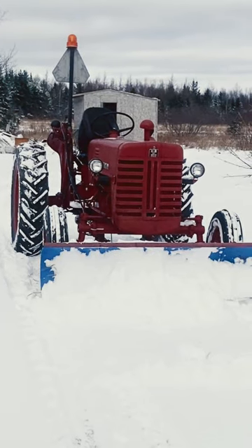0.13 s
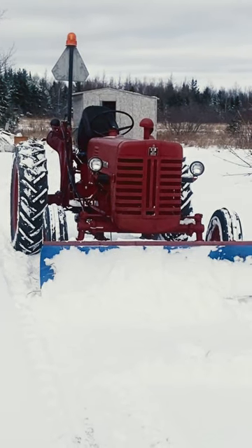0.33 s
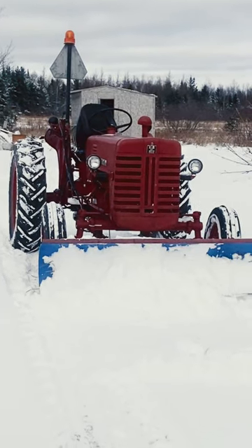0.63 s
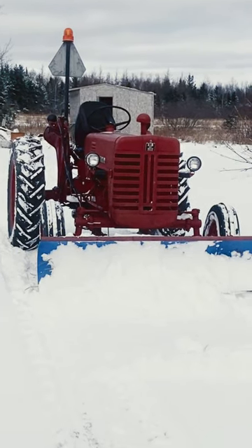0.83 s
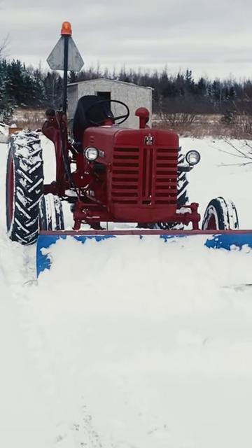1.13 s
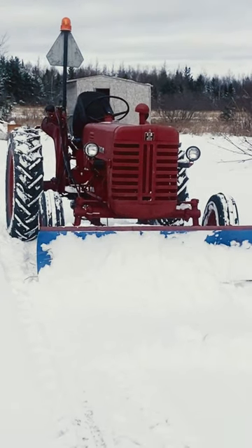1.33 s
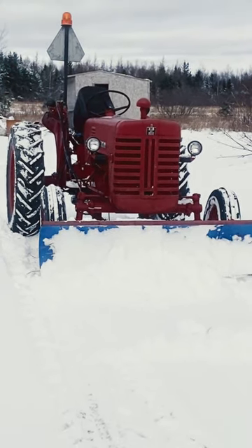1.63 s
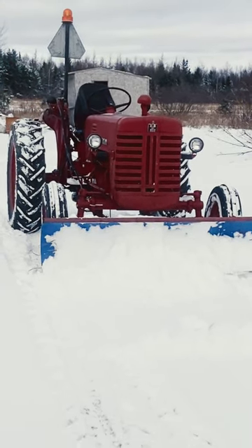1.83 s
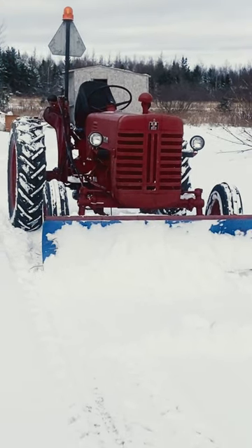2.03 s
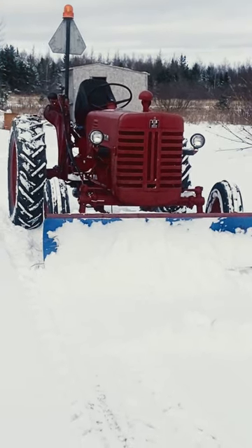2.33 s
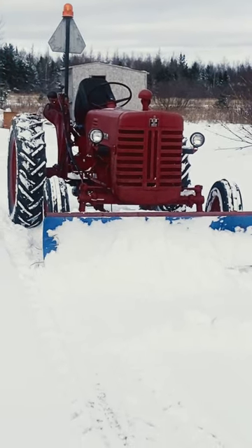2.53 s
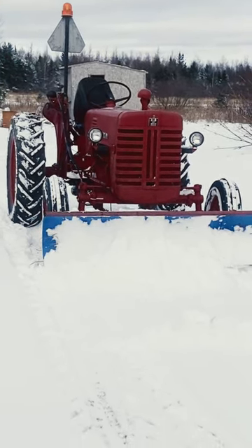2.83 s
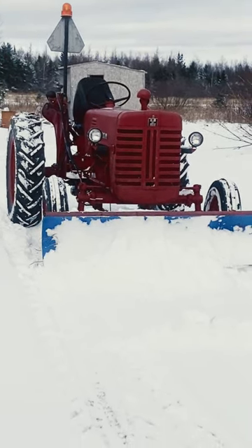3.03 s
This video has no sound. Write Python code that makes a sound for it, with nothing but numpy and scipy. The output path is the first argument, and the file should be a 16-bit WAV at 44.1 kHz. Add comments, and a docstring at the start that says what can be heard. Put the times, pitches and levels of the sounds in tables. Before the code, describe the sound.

An old tractor engine idles steadily outdoors, throbbing and clattering, with soft low wind bumps.

```python
"""Idling four-cylinder tractor

An old engine idles: uneven exhaust throb (sum of cycle-rate cosines), hollow knocks and valve taps
(decaying modes), dry ticks, clatter and hiss (shaped noise), singing panels (narrow wavering bands).
Soft low bumps (gliding tones) with puffs of air (noise) hit the microphone, over a low noise rumble.
"""
import sys
import numpy as np
from scipy.fft import rfft, irfft, next_fast_len
from scipy.io import wavfile
from scipy.ndimage import map_coordinates

SR = 44100
rng = np.random.default_rng(int(sys.argv[2]) if len(sys.argv) > 2 else 0)


def bounce(signal):
    """Save signal as a 16-bit WAV file at the path given by the first command-line argument."""
    frames = np.transpose(np.atleast_2d(signal))
    limited = np.clip(frames, -1, 1)
    pcm = np.round(limited * 32767).astype(np.int16)
    wavfile.write(sys.argv[1], SR, pcm)


N = 140679

# Crankshaft speed. Each row: time in seconds, speed in rpm.
CRANK_RPM = [(0.0, 1212), (0.25, 1206), (0.7, 1220), (1.25, 1234), (1.52, 1241), (1.8, 1212), (2.0, 1210),
             (2.25, 1182), (2.6, 1220), (2.78, 1210), (2.95, 1233), (3.19, 1213)]
# Exhaust orders. Each row: multiple of the cycle rate, relative level in dB.
EXHAUST_ORDERS = [(1, -53), (2, -32.5), (3, -32.5), (4, -1.5), (5, -22.5), (6, -19), (7, -18), (8, 5.5),
                  (9, -10), (10, -6), (11, -9), (12, -19), (13, -13.5), (14, -18), (15, -23)]
EXHAUST_DB, EXHAUST_PLACE_CYCLES, SIDE_ORDER_RAD = -31, 0.98, 0.7
ORDER_WAVER_DB, THROB_WAVER_DB = 0.93, 0.6

# Hollow knocks. Each row: place in the cycle 0-1, left gain in dB, right gain in dB, pitch ratio,
# fall time constant in seconds.
KNOCKS = [(0.069, -40.5, -31, 1.13, .01), (0.319, -27.5, -22.5, 1.012, 0.0069),
          (0.486, -39.5, -35, 1.07, 0.0029), (0.563, -31, -27.5, 0.973, .0065),
          (.615, -40, -34.5, .97, 0.0064), (0.82, -42.5, -39, 1, .008)]
# Knock modes. Each row: frequency in Hz, relative level in dB before the microphone shift, in dB after.
KNOCK_MODES = [(531.7, -14, -11.5), (570.7, -0.5, -10), (641, -27, -0.5), (674, -2, -16.5)]
# Gain common to all knocks. Each row: time in seconds, gain in dB.
KNOCK_GAIN = [(0, 0.5), (.9, -0.5), (1.3, -1), (1.8, 0.5), (2.0, 0), (2.4, -1), (3.19, 0)]
KNOCK_DETUNE_SHARE = 0.015

# Valves opening and shutting. Each row: place in the cycle 0-1, tap gain in dB, pitch ratio,
# extra gain of the upper cover modes in dB, gain of the dry tick in dB.
VALVE_TAPS = [(.035, -45.5, 1, 9.5, -44.5), (.11, -48.5, 1, -6.5, -45), (0.224, -40, .97, -2.5, -54.5),
              (.278, -44, 1.03, 7.5, -44.5), (.472, -32.5, .89, 4, -47), (.525, -39, 1.02, -5.5, -51),
              (0.596, -39.5, 1.01, -11, -49.5), (.712, -37, 1.05, -7, -54), (.785, -38.5, 1, 5.5, -55.5),
              (.96, -30, .975, -1, -50)]
# Valve cover modes. Each row: frequency in Hz, relative level in dB before the microphone shift,
# in dB after, 60 dB decay time in seconds.
COVER_MODES = [(722, -1, -11, .035), (1217, -9.5, -5.5, 0.051), (1363.5, -1, -0.5, 0.043),
               (1642, -11, -9, .05), (1847, -15, -11.5, 0.027), (2071, -8, -7.5, 0.041),
               (2224, -22.5, -14, 0.013)]
TAP_MODE_SCATTER_DB, TAP_DETUNE_SHARE = 2.26, 0.011
# Dry tick spectrum. Each row: frequency in Hz, relative density in dB per Hz.
TICK_SPECTRUM = [(1200, -26.5), (1700, -1.5), (2100, 0), (2550, -14), (3100, 0.5), (4500, -4), (5400, -10),
                 (6500, -19), (8000, -15.5), (9000, -29)]
# Ticks of a loose part. Each row: start in seconds, gain in dB.
LOOSE_TICKS = [(2.313, -45), (2.365, -43), (2.467, -46.5), (2.52, -41.5)]

# Clatter swells, one per firing. Each row: place in the cycle 0-1, gain in dB over the steady wash
# (before the depth and the burst shape).
FIRING_SWELLS = [(0.208, 5.5), (0.452, 8.5), (0.699, 9.5), (0.948, 6.5)]
# Clatter spectrum of the block. Each row: frequency in Hz, relative density in dB per Hz.
CLATTER_SPECTRUM = [(120, -36.5), (190, 0), (245, -4.5), (295, 2.5), (350, -2), (395, 0.5), (460, -1.5),
                    (570, -3), (720, -3), (850, -2), (1030, -10), (1200, -4), (1400, -5), (1650, -7),
                    (1850, -12.5), (2050, -10.5), (2280, -9), (2420, -26), (2600, -22.5), (3050, -18.5),
                    (3550, -20.5), (3950, -26.5), (4600, -24), (5300, -37.5), (7000, -46.5)]
# Clatter colour after the microphone shift. Each row: frequency in Hz, change in dB.
CLATTER_SHIFT = [(200, -3), (300, 0.5), (400, -2), (600, 2), (800, -2.5), (1150, 1.5), (1420, -3.5),
                 (1900, 1), (2550, 3.5), (3200, -0.5), (4500, 1)]
# Clatter that is the same every cycle. Each row: frequency in Hz, power share 0-1.
REPEAT_SHARE = [(150, 0.39), (1300, 0.56), (2000, 0.17), (3200, 0.081)]
# Spectrum of the fine ticking hiss. Each row: frequency in Hz, relative density in dB per Hz.
HISS_SPECTRUM = [(2000, -36.5), (3300, 1.5), (4600, -11.5), (5700, 5.5), (6400, 10), (7000, 7), (7600, 7.5),
                 (8400, 2), (9000, -32.5)]
CLATTER_DB, HISS_DB, RUMBLE_DB = -36, -60, -33.5

# Sheet-metal panels. Each row: frequency in Hz, waver rate (band width) in Hz,
# level in dB before the microphone shift, in dB after.
PANELS = [(294, 22, -54, -51), (391, 22, -54.5, -56.5), (574.4, 29, -46, -55), (709, 35, -46, -57),
          (1381, 45, -43.5, -56)]

# Bumps on the microphone. Each row: middle in seconds, gain in dB, pitch at the middle in Hz,
# envelope time scale in seconds, gain of the air puff in dB.
BUMPS = [(0.841, -16.5, 66, 0.014, -34), (1.0492, -9, 78, 0.008, -29.5), (1.2804, -9.5, 79, 0.0067, -37),
         (1.334, -14.5, 74.7, 0.0048, -40.5), (1.61, -20, 92, 0.0039, -30),
         (1.63, -10.5, 60.5, 0.011, -43.5), (2.165, -18, 58, 0.0063, -36.5)]
BUMP_SETTLE_S, BUMP_START_RATIO, BUMP_END_RATIO = 0.01324, 2.8, 0.645  # ratios to the middle pitch
# Puff spectrum. Each row: frequency in Hz, relative density in dB per Hz.
PUFF_SPECTRUM = [(40, -13), (90, 1), (180, -0.5), (300, -7.5), (480, -31), (900, -61)]
PUFF_LEAD_S, PUFF_SCALE_S = 0.0096, 0.015
# Rumble spectrum. Each row: frequency in Hz, relative density in dB per Hz.
RUMBLE_SPECTRUM = [(15, -43.5), (28, -26), (42, -1), (60, 7.5), (80, -4), (100, 6), (120, -7), (160, -12.5),
                   (220, -23), (400, -52.5)]

# Microphone shift. Each row: time in seconds, how far it has shifted 0-1.
MIC_SHIFT = [(0, 0.49), (1.3, 0.14), (1.95, 0.91), (3.19, 0.83)]
# Left-right likeness. Each row: frequency in Hz, likeness 0-1.
LIKENESS = [(60, 0.49), (200, 0.28), (600, 0.54), (1000, 0.16), (1350, 0.88), (2200, 0.88), (4000, 0.22),
            (8000, 0.28)]
# Left-right phase. Each row: frequency in Hz, lead of left over right in radians.
LEFT_LEAD = [(100, 0.5), (240, 0.5), (400, -2.5), (750, -1), (1200, 0.9), (1550, -2), (2100, 1.66),
             (2600, -11), (3000, -5.5), (8000, -9)]
# Left-right balance. Each row: frequency in Hz, left minus right in dB.
BALANCE = [(60, 7), (94, -6), (150, -0.5), (230, -0.5), (360, 1.5), (560, -3.5), (880, -6.5), (1380, -7.5),
           (2150, -2), (3370, -2), (5270, -0.5), (8250, -11)]
TOP_HZ = 8900


def exhaust(cycles):
    """Pipe throb: strongest at twice the firing rate, with side orders from unequal cylinders."""
    throb = np.zeros(N)
    for order, db in EXHAUST_ORDERS:
        # The shift vanishes at multiples of the firing rate (every fourth order).
        shift_rad = SIDE_ORDER_RAD * np.sin(np.pi * order / 4)
        phase = 2 * np.pi * order * (cycles - EXHAUST_PLACE_CYCLES) + shift_rad
        throb += amp(db + ORDER_WAVER_DB * wobble(5.4)) * np.cos(phase)
    level = amp(EXHAUST_DB + THROB_WAVER_DB * wobble(29.9))
    return level * unit(throb) * pan(db=-4.5)


def knocks(cycles, right_lead_rad=1.75, rough_rad=0.1, rise_s=0.002):
    """Hollow modes that swell quickly and ring on, each stroke at a slightly different pitch."""
    out, shift = np.zeros((2, N)), curve(MIC_SHIFT)
    for place, left_db, right_db, ratio, fall_s in KNOCKS:
        u, gain = strokes(cycles, place, scatter_db=0.5, jitter_s=0.0002)
        pitch = ratio * (1 + KNOCK_DETUNE_SHARE * per_stroke(cycles, place))
        phase = np.array([[0], [right_lead_rad]]) + rough_rad * np.array([wobble(250), wobble(250)])
        note = np.zeros((2, N))
        for hz, before_db, after_db in KNOCK_MODES:
            level = amp(before_db + (after_db - before_db) * shift)
            note += level * np.cos(2 * np.pi * hz * pitch * u + phase)
        envelope = 2 / (np.exp(-u / rise_s) + np.exp(u / fall_s))
        out += amp([[left_db], [right_db]]) * gain * note * envelope
    return out * amp(curve(KNOCK_GAIN))


def taps(cycles, attack_s=0.0012, treble_hz=1500):
    """Valves ring their cover in decaying modes, every stroke with its own mix."""
    out, shift = np.zeros((2, N)), curve(MIC_SHIFT)
    for place, db, ratio, treble_db, _ in VALVE_TAPS:
        u, gain = strokes(cycles, place, scatter_db=1.2, jitter_s=0.0003)
        u = np.maximum(u, 0)
        blow = amp(db) * gain * (1 - np.exp(-u / attack_s))
        for hz, before_db, after_db, t60_s in COVER_MODES:
            level_db = before_db + (after_db - before_db) * shift
            level_db = level_db + treble_db * (hz > treble_hz)
            level_db = level_db + TAP_MODE_SCATTER_DB * per_stroke(cycles, place)
            pitch_hz = hz * ratio * (1 + TAP_DETUNE_SHARE * per_stroke(cycles, place))
            ring = amp(level_db - 60 * u / t60_s) * np.sin(2 * np.pi * pitch_hz * u)
            out += pan(along(BALANCE, hz)) * (blow * ring)
    return out


def ticks(cycles, rise_s=0.00086, fall_s=0.0036):
    """Dry noise bursts of uneven strength: one at each valve tap, a few from a loose part."""
    def burst(u):
        u = np.maximum(u, 0)
        return (1 - np.exp(-u / rise_s)) * np.exp(-u / fall_s)

    level = np.zeros(N)
    for start_s, db in LOOSE_TICKS:
        level += amp(db) * burst(np.arange(N) / SR - start_s)
    for place, *_, db in VALVE_TAPS:
        u, gain = strokes(cycles, place, scatter_db=2, jitter_s=0.0004)
        level += amp(db) * gain * burst(u)
    return level * spread(rng.standard_normal((2, N)), TICK_SPECTRUM)


def clatter(cycles):
    """Gears and pistons: noise that partly repeats each cycle and swells at every firing."""
    size = 4400  # noise values per cycle
    read = (cycles + 0.00089 * wobble(25)) % 1 * size
    patterns = rng.standard_normal((2, size))
    same = np.array([map_coordinates(p, [read], mode="grid-wrap") for p in patterns])
    fresh = rng.standard_normal((2, N))
    share = lambda hz: np.clip(along(REPEAT_SHARE, hz), 0, 1)
    rattle = filtered(same, lambda hz: np.sqrt(share(hz)))
    rattle = rattle + filtered(fresh, lambda hz: np.sqrt(1 - share(hz)))
    envelope = swell(cycles, lag_s=0.00022, rise_s=0.0031, fall_s=0.011, depth_db=0.0)
    body = spread(echoes(rattle * envelope), CLATTER_SPECTRUM)
    change = filtered(body, lambda hz: amp(along(CLATTER_SHIFT, hz)) - 1)
    return amp(CLATTER_DB) * (body + curve(MIC_SHIFT) * change)


def hiss(cycles):
    """Fine ticking: treble noise with a rapidly flickering level, swelling at every firing."""
    flicker = amp(2.6 * wobble(930) + 1.2 * wobble(28))
    noise = rng.standard_normal((2, N)) * flicker
    envelope = swell(cycles, lag_s=0.0016, rise_s=0.0066, fall_s=0.0089, depth_db=8.5)
    return amp(HISS_DB) * spread(echoes(noise * envelope), HISS_SPECTRUM)


def panels(cycles):
    """Hood and grille sing in narrow wavering bands, fed by every firing."""
    shift, t = curve(MIC_SHIFT), np.arange(N) / SR
    out = np.zeros((2, N))
    for hz, width_hz, before_db, after_db in PANELS:
        phase = 2 * np.pi * hz * t
        note = unit(wobble(width_hz) * np.cos(phase) + wobble(width_hz) * np.sin(phase))
        level = amp(before_db + (after_db - before_db) * shift)
        out += pan(along(BALANCE, hz)) * level * note
    return out * unit(swell(cycles, lag_s=0.0012, rise_s=0.003, fall_s=0.018, depth_db=-2))


def bumps(rough_rad=0.3):
    """Soft thuds on the microphone: tones that settle down in pitch after a ragged start."""
    out = np.zeros(N)
    for middle_s, db, hz, scale_s, _ in BUMPS:
        u = np.arange(N) / SR - middle_s
        glide = np.exp(np.minimum(-u / BUMP_SETTLE_S, 10))
        ratio = BUMP_END_RATIO + (1 - BUMP_END_RATIO) * glide
        turns = np.cumsum(hz * np.minimum(ratio, BUMP_START_RATIO)) / SR
        turns = turns - turns[round(middle_s * SR)]
        ragged = rough_rad * np.clip(-u / scale_s, 0, 2) * wobble(120)
        envelope = 1 / np.cosh(np.clip(u / scale_s, -20, 20))
        out += amp(db) * np.cos(2 * np.pi * turns + ragged) * envelope
    return out * pan(db=7.0)


def puffs():
    """Rough air around each bump: low noise, independent at the two ports."""
    level = np.zeros(N)
    for middle_s, *_, db in BUMPS:
        u = np.arange(N) / SR - middle_s + PUFF_LEAD_S
        level += amp(db) / np.cosh(np.clip(u / PUFF_SCALE_S, -20, 20))
    noise = rng.standard_normal((2, N))
    return level * unit(filtered(noise, lambda hz: amp(along(PUFF_SPECTRUM, hz))))


def rumble():
    """Irregular low noise under the throb."""
    return amp(RUMBLE_DB) * spread(rng.standard_normal((2, N)), RUMBLE_SPECTRUM)


def per_stroke(cycles, place):
    """A random value held through each stroke at one place in the cycle."""
    return rng.standard_normal(64)[np.round(cycles - place).astype(int) + 2]


def strokes(cycles, place, scatter_db, jitter_s):
    """Seconds from the nearest stroke (at mean speed, jittered), and that stroke's random gain."""
    mean_cycle_hz = cycles[-1] * SR / N
    u = (cycles - place - np.round(cycles - place)) / mean_cycle_hz
    u = u + jitter_s * per_stroke(cycles, place)
    return u, amp(scatter_db * per_stroke(cycles, place))


def swell(cycles, lag_s, rise_s, fall_s, depth_db):
    """Envelope that rises at every firing over a steady wash; powers add."""
    power = np.ones(N)
    for place, db in FIRING_SWELLS:
        u, gain = strokes(cycles, place, scatter_db=0.6, jitter_s=0.0004)
        u = np.maximum(u - lag_s, 0)
        burst = (1 - np.exp(-u / rise_s)) * np.exp(-u / fall_s)
        power += (amp(db + depth_db) * gain * burst) ** 2
    return np.sqrt(power)


def echoes(x, ripple_db=2.44, width_hz=32):
    """Reflections between metal parts: a random narrow ripple on the spectrum."""
    knots = rng.standard_normal(4000)

    def response(hz):
        ripple = map_coordinates(knots, [hz / width_hz])
        return amp(ripple_db * np.clip(hz / 1500, 0, 1) * ripple)

    return filtered(x, response)


def spread(pair, spectrum):
    """Colour two noises and place them between the microphone ports, at rms 1."""
    def mid_side(hz):
        turn = np.arccos(np.clip(along(LIKENESS, hz), -1, 1)) / 2
        return amp(along(spectrum, hz)) * [np.cos(turn), np.sin(turn)]

    def ports(hz):
        left = amp(along(BALANCE, hz) / 2) * np.exp(1j * along(LEFT_LEAD, hz) / 2)
        return np.array([left, 1 / left])

    mid, side = filtered(pair, mid_side)
    return unit(filtered(np.array([mid + side, mid - side]), ports))


def pan(db):
    """Left and right gains for a level difference."""
    return amp(np.array([[db], [-db]]) / 2)


def filtered(x, response):
    """x times a complex response of frequency in Hz."""
    m = next_fast_len(N + SR // 2)
    return irfft(rfft(x, m) * response(np.fft.rfftfreq(m, 1 / SR)), m)[..., :N]


def wobble(rate_hz):
    """A smooth random curve, rate_hz knots a second."""
    knots = rng.standard_normal(int(N * rate_hz / SR) + 4)
    return map_coordinates(knots, [np.arange(N) * rate_hz / SR])


def curve(rows):
    """One value per sample from (seconds, value) rows."""
    return np.interp(np.arange(N) / SR, *np.transpose(rows))


def along(points, hz):
    """Interpolate (Hz, value) points on a log frequency axis."""
    f, v = np.transpose(points)
    return np.interp(np.log(hz + 1), np.log(f + 1), v)


def unit(x):
    """Scale to rms 1."""
    return x / np.sqrt(np.mean(x ** 2) + 1e-20)


def amp(db):
    """Decibels to gain."""
    return 10 ** (np.asarray(db) / 20)


def scene():
    """One cycle is two turns of the crankshaft; it drives all the engine's layers."""
    cycles = np.cumsum(curve(CRANK_RPM)) / (2 * 60 * SR)
    engine = exhaust(cycles) + knocks(cycles) + taps(cycles) + ticks(cycles)
    engine = engine + clatter(cycles) + hiss(cycles) + panels(cycles)
    return engine + bumps() + puffs() + rumble()


def record(dry):
    """Fade the ends over 100 samples; the recorder keeps nothing above its band limit."""
    to_nearest_end = np.minimum(np.arange(N), np.arange(N)[::-1])
    fade = np.minimum(to_nearest_end / 100, 1)
    return filtered(dry * fade, lambda hz: hz < TOP_HZ)


dry = scene()
out = record(dry)
bounce(out)
```